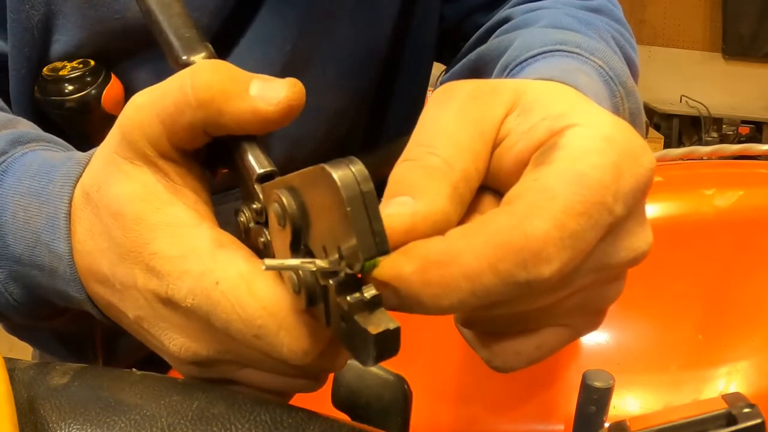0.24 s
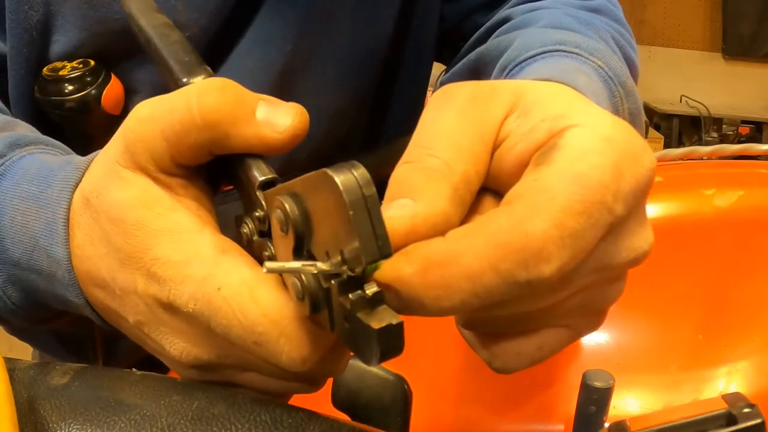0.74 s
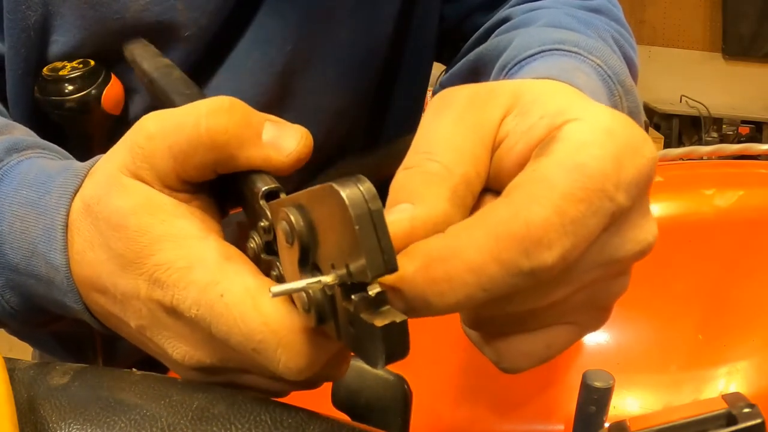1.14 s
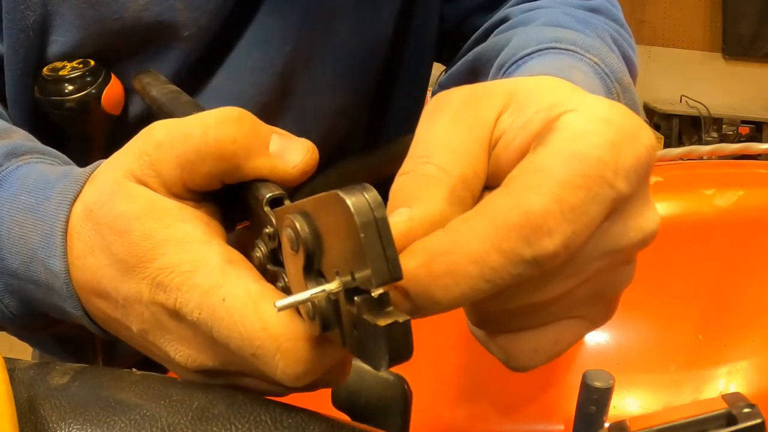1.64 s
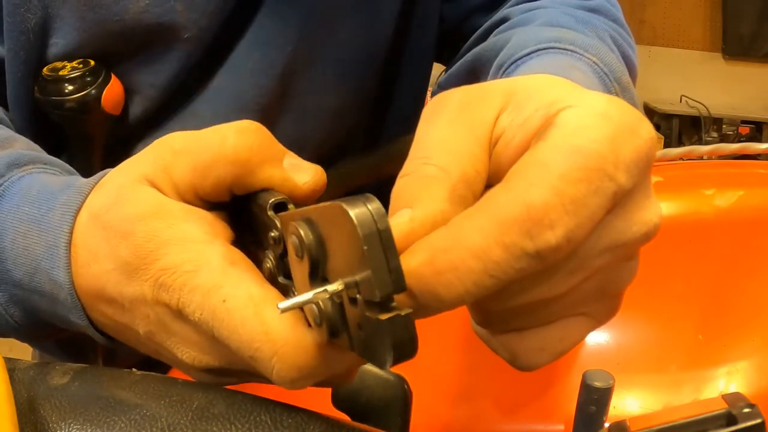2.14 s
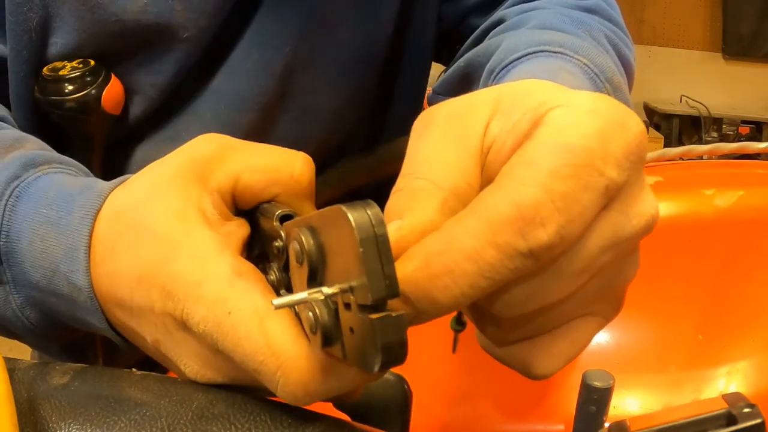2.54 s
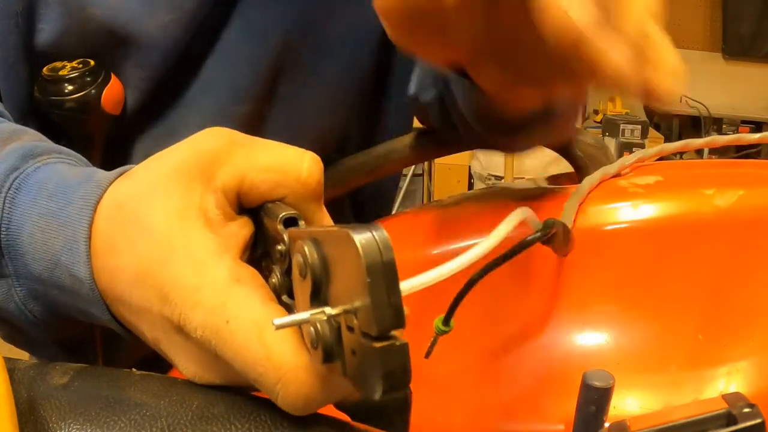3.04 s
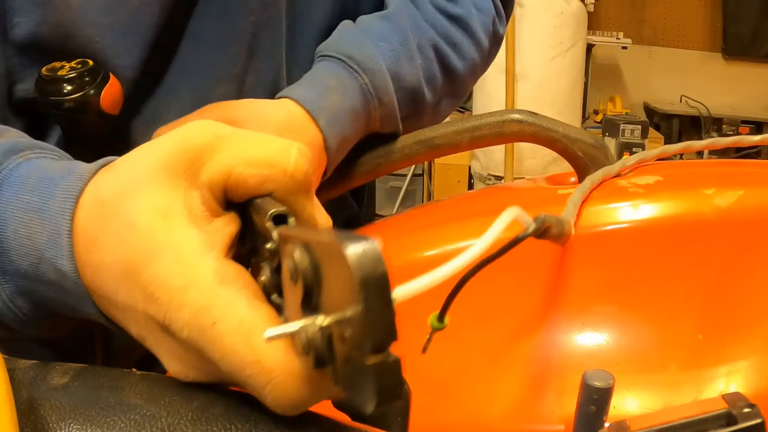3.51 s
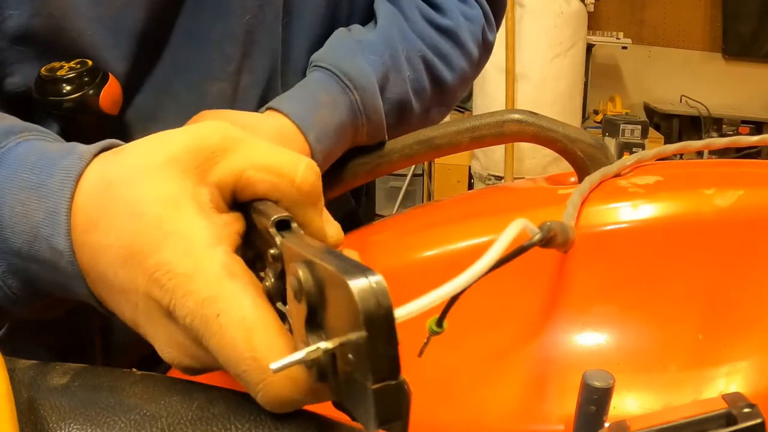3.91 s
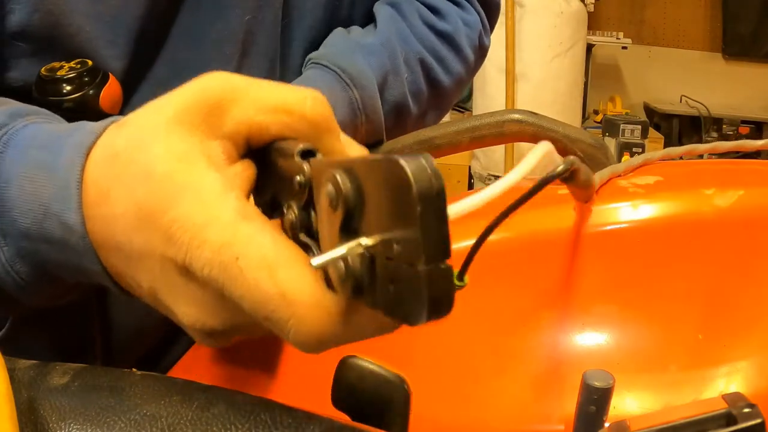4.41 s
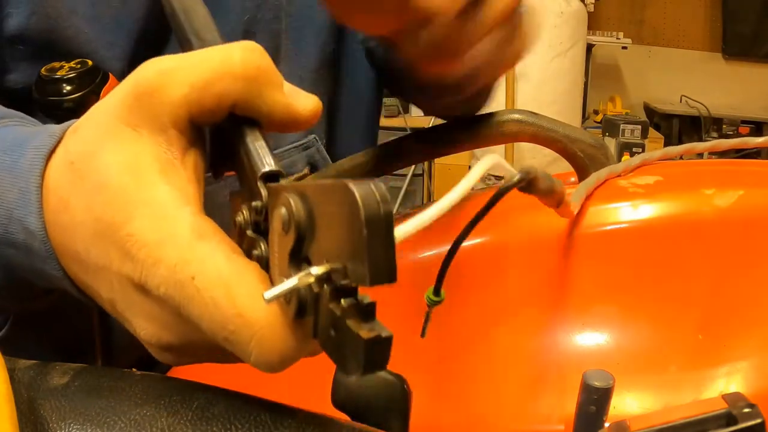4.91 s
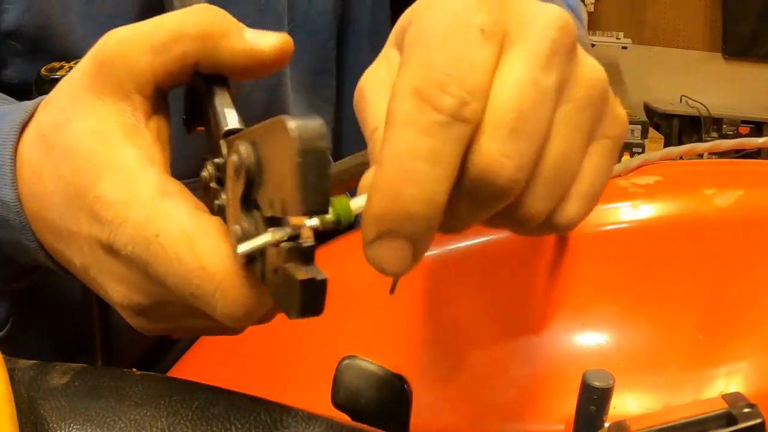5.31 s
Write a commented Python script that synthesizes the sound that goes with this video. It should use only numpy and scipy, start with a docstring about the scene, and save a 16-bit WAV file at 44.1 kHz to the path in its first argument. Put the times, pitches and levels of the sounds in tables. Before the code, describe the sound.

A small quiet workshop, heard very close and in stereo. For the first two seconds there is only soft air, a faint distant wavering drone that sinks in pitch, and tiny wire scratches around 0.6 to 0.95 s. At about 2.1 s a ratchet crimping tool is squeezed: five crisp, bright metal clicks by 2.4 s, then two more near 2.6 and 2.75, with small dull ticks, bumps and sleeve rustle. Around 3.2 s a hand brushes and softly knocks a sheet-metal tank. From 3.6 to 4.2 s a second squeeze clicks about every tenth of a second. Light ticks follow at 4.5; from 4.65 the pawl scrapes back, irregular at first, then a rapid rattle to 4.95 as the spring opens the handles, leaving a thin metallic ring. At 5.37 s a tick, high ping and light tank knock, then the wire slides off with a faint rising hiss.

```python
"""In a small workshop, close to the microphone, a ratchet crimping tool is squeezed shut in two runs of clicks
(noisy pawl impacts ring jaws, pawl and lever), then springs open while the pawl rattles back over its teeth.
Hands and sleeves rub (shaped noise), the tool knocks softly on a sheet-metal tank (decaying modes), a wire
catches, pings free and slides off, and a faint drone (two tones and a rumble) wavers far away in quiet air."""
import sys
import numpy as np
from scipy import signal
from scipy.fft import rfft, irfft
from scipy.io import wavfile
from scipy.ndimage import uniform_filter1d

SR = 44100
rng = np.random.default_rng(int(sys.argv[2]) if len(sys.argv) > 2 else 0)


def to_wav(sig):
    """Store sig (one row per channel, or 1-D mono) as 16-bit WAV at the path in sys.argv[1].

    Samples outside -1..1 are clipped; the rate is SR.
    """
    pcm = np.clip(np.atleast_2d(sig), -1, 1) * 32767
    pcm = np.round(pcm).astype(np.int16)
    wavfile.write(sys.argv[1], SR, pcm.T)  # frames by channels


N = 245240
TIME = np.arange(N) / SR
CLICK_T = np.arange(1024) / SR
LEAD_S = .004  # part of each click that precedes the drop of the pawl

# the pawl drops into a tooth while closing: start_s, gain_db, jaw_db, jaw_hz, pawl_hz
# (jaw_db: ring of the jaws before the gain of the direction)
CLOSING_TEETH = [(2.0968, -23, 2.5, 4060, 6200), (2.1432, -21.5, 3, 3820, 7900),
                 (2.2009, -22, 1, 3870, 7800), (2.2612, -22, 3, 3820, 6960), (2.3985, -21, 1.5, 3740, 7520),
                 (2.616, -22, -5.5, 3770, 6400), (2.735, -23.5, -4.5, 3870, 6300),
                 (3.6338, -24.5, -2.5, 3780, 6010), (3.7218, -23, -2, 3890, 6380),
                 (3.824, -24, 2, 3810, 6680), (3.9161, -22.5, -6.5, 3880, 6300),
                 (3.9927, -22.5, -5.5, 4220, 6300), (4.098, -37, -5, 3600, 5950),
                 (4.103, -25, 0, 3980, 6170), (4.2157, -39, -5.5, 3730, 6360)]
# spectrum of the opening crack, shared with the linkage ticks: freq_hz, gain_db
OPENING_SPECTRUM = [(200, -31), (700, -17.5), (1500, -0.5), (2600, 3), (4800, 10.5), (6000, 7), (6800, 7.5),
                    (8000, 5), (8800, -2), (9600, 0.5), (11400, 0), (12100, 2), (15500, -14.5),
                    (16000, -32.5)]


def undb(db):
    """Decibels to gain."""
    return 10 ** (np.asarray(db) / 20)


def unit(x, seconds):
    """Scale to the energy of a signal of rms 1 lasting so many seconds."""
    return x * np.sqrt(seconds * SR / np.sum(x ** 2))


def blow(x, db):
    """Set the level of a click, its energy counted over 5 ms."""
    return undb(db) * unit(x, .005)


def add(track, s, x):
    """Mix x into the track from time s."""
    i = int(s * SR)
    track[i:i + len(x)] += x[:N - i]


def colour(x, points):
    """Minimum-phase filter with the given (Hz, dB) spectrum, made by folding its cepstrum."""
    hz, db = np.transpose(points)
    f = np.maximum(np.fft.rfftfreq(4096, 1 / SR), 1)
    log_gain = np.log(undb(np.interp(np.log(f), np.log(hz), db)))
    cepstrum = irfft(log_gain)
    half = len(cepstrum) // 2
    cepstrum[1:half] *= 2
    cepstrum[half + 1:] = 0
    impulse = irfft(np.exp(rfft(cepstrum)))
    return signal.fftconvolve(x, impulse)[:len(x)]


def resonate(x, hz, width_hz):
    """One resonance."""
    b, a = signal.iirpeak(hz, hz / min(width_hz, SR / 4), SR)
    return signal.lfilter(b, a, x)


def ring(modes):
    """Free decay of a set of modes (Hz, dB, t60 s), each starting at a random phase."""
    t = np.arange(SR) / SR
    out = np.zeros(SR)
    for hz, db, t60_s in modes:
        tone = np.sin(2 * np.pi * (hz * t + rng.random()))
        out += undb(db) * tone * np.exp(-np.log(1000) * t / t60_s)
    return out


def walk(rate):
    """Smooth random wander with a spread of 1; rate is in new values per second."""
    k = int(SR / rate)
    steps = np.repeat(rng.standard_normal(N // k + 1), k)
    wander = uniform_filter1d(uniform_filter1d(steps, k), k)[:N]
    return wander / wander.std()


def air():
    """Quiet room noise, almost independent left and right."""
    # spectrum of the air: freq_hz, gain_db
    spectrum = [(20, -15.5), (50, -3), (100, -14), (160, -1), (230, -6.5), (320, -8), (440, -12.5),
                (700, -21), (1200, -20.5), (4500, -32), (7300, -34), (9500, -44), (16000, -49.5)]
    mid, side = (unit(colour(rng.standard_normal(N), spectrum), N / SR) for _ in range(2))
    return undb(-72) * (mid + 0.97 * side * np.array([[1], [-1]]))


def drone():
    """Two faint tones drift apart; the lower one wavers and flutters over a low rumble."""
    # path of the lower tone and its rumble: time_s, pitch_hz, gain_db
    low_path = [(0, 243, -67), (1.398, 228, -67), (2.399, 165, -69), (2.899, 160, -78), (3.5, 152, -71.5),
                (3.9, 162, -79.5), (5.56, 160, -84)]
    s, *columns = np.transpose(low_path)
    low_hz, low_db = (np.interp(TIME, s, c) for c in columns)
    # the upper tone climbs slowly and fades
    high_hz = 404 + 39 * TIME
    high_db = -78 - 2.5 * TIME
    waver = .08 * np.sin(2 * np.pi * 4.2 * TIME + walk(2.4)) + 0.036 * walk(50)
    low = np.sin(2 * np.pi * np.cumsum(low_hz * (1 + waver)) / SR)
    high = np.sin(2 * np.pi * np.cumsum(high_hz * (1 + 0.0085 * walk(7.3))) / SR)
    rumble = unit(resonate(resonate(rng.standard_normal(N), 165, 38), 210, 90), N / SR)
    flutter_db = 4 * walk(70)
    lower_part = (low * undb(flutter_db - 3.5) + 0.54 * rumble) * undb(low_db)
    return lower_part + high * undb(high_db + 1.3 * walk(43))


def catches(count=5):
    """Strands of the wire end catch in the terminal at uneven moments of each push."""
    # pushes of the wire: start_s, length_s
    pushes = [(.61, .18), (.84, .11)]
    # modes of the terminal held in the jaws: freq_hz, gain_db, t60_s
    terminal = [(2370, -2, 0.01), (3430, -5, 0.018), (4500, 0, 0.014), (4900, -1, .01)]
    mean_db, scatter_db = -75, 1.5
    out = np.zeros(N)
    for start, length in pushes:
        for k in range(count):
            s = start + length * (k + rng.random()) / count
            add(out, s, blow(ring(terminal), mean_db + scatter_db * rng.standard_normal()))
    return out


def wire():
    """The wire is pushed in; at the end the terminal pings free and the wire slides off with a rising hiss."""
    ping_s, ping_hz, ping_db, ping_t60_s = 5.364, 9800, -66, .2
    slide_from_s, slide_rise_s, slide_db = 5.42, .11, -76.5
    slide_hz, slide_hz_per_s = 1100, 5600
    out = catches()
    add(out, ping_s, blow(ring([(ping_hz, 0, ping_t60_s)]), ping_db))
    # drawn away through the fingers, faster and louder: slow noise on a rising carrier
    drawn_s = np.maximum(TIME - slide_from_s, 0)
    low_pass = signal.butter(2, 150, fs=SR, output="sos")
    grain = unit(signal.sosfilt(low_pass, rng.standard_normal(N)), N / SR)
    carrier = np.sin(2 * np.pi * np.cumsum(slide_hz + slide_hz_per_s * drawn_s) / SR)
    squeak = np.sqrt(2) * grain * carrier
    return out + squeak * undb(slide_db) * np.minimum(drawn_s / slide_rise_s, 1)


def bump(hz):
    """A thud that dies away within a few cycles, with a scuff of skin."""
    t, decay_s = np.arange(SR // 4) / SR, 2.7 / hz
    fade = np.exp(-t / decay_s)
    thud = unit(np.sin(2 * np.pi * hz * t) * fade, decay_s)
    push = rng.standard_normal(len(t)) * fade
    scuff = unit(resonate(resonate(push, hz, hz), hz, hz), decay_s)
    return 0.9 * thud + 1.2 * scuff


def rubbing():
    """Sleeve and fingers rub: cloth-coloured noise swells with each stroke and flickers in level."""
    # strokes: start_s, length_s, gain_db
    rubs = [(0.585, 0.76, -86.5), (2.013, 0.89, -70.5), (3.032, 0.026, -70.5), (3.15, 0.045, -69),
            (3.501, 0.75, -73.5), (4.554, .1, -73), (4.75, 0.2, -63.5), (5.299, .1, -79.5),
            (5.536, .03, -74.5)]
    # spectrum of the cloth: freq_hz, gain_db
    cloth = [(60, -18), (230, 6.5), (600, -9), (1300, 0), (3000, -2), (7000, -2), (9000, -10), (15000, -27)]
    attack_s, release_s = 0.017, 0.054
    strokes = np.zeros(N)
    for s, length, db in rubs:
        rise = np.minimum(TIME - s, 0) / attack_s
        fall = np.maximum(TIME - s - length, 0) / release_s
        strokes += undb(db) * np.exp(rise - fall)
    rub = unit(colour(rng.standard_normal(N), cloth), N / SR)
    return rub * strokes * undb(1.4 * walk(76))


def handling():
    """Damped bumps, the recoil of the teeth in the hand, ringing knocks on the tank and rubbing cloth."""
    # soft bumps of hand and tool: start_s, gain_db, centre_hz
    bumps = [(2.524, -55, 216), (2.573, -58.5, 210), (2.761, -57.5, 290), (2.768, -53.5, 117),
             (2.841, -65.5, 96), (2.911, -63, 287.3), (3.036, -62.5, 1166), (3.18, -65, 330),
             (3.475, -68.5, 170), (3.635, -62.5, 330), (3.723, -65.5, 302), (3.985, -62, 459),
             (4.133, -62, 620), (5.366, -60.5, 382), (5.372, -57.5, 880), (5.392, -63, 199)]
    # knocks on the tank: start_s, level_db
    knocks = [(3.175, -61.5), (5.37, -61)]
    # modes of the sheet-metal tank: freq_hz, gain_db, t60_s
    tank = [(280.5, 6, 0.26), (459.6, 9.5, 0.18), (760, -9, 0.19), (850, -9, 0.39), (975, 5, 0.14),
            (1054, 6, 0.15)]
    recoil_db, recoil_hz = -71, 330
    out = np.zeros(N)
    for s, db, hz in bumps:
        add(out, s, undb(db) * bump(hz))
    for s, *_ in CLOSING_TEETH + release():
        add(out, s, undb(recoil_db) * bump(recoil_hz))
    for s, db in knocks:
        add(out, s, undb(db) * unit(ring(tank), 0.027))
    return out + rubbing()


def contact(slip_ms, chatter_ms, scrape_db, snap):
    """Force on a tooth: the pawl slips over the crest, lands with a snap, chatters and scrapes to rest."""
    ms = (CLICK_T - LEAD_S) * 1000
    drop = np.exp(-abs(ms) / np.where(ms < 0, slip_ms, chatter_ms))
    scrape = undb(scrape_db) * np.exp(-abs(ms) / np.where(ms < 0, 2 * slip_ms, 4.5))
    landing = signal.unit_impulse(len(ms), int(LEAD_S * SR) + 6)  # six samples after the drop
    return snap * landing + (drop + scrape) * rng.standard_normal(len(ms))


def linkage(snap):
    """Play in the pivots gives small dull ticks: one broad resonance over a weaker crack."""
    # ticks: start_s, level_db, centre_hz
    ticks = [(2.011, -58, 3330), (2.0864, -51, 3900), (2.524, -45, 3330), (2.576, -48.5, 2120),
             (2.687, -51.5, 3620), (2.764, -46, 2800), (2.833, -58, 3280), (2.869, -56, 3410),
             (2.888, -54, 4300), (2.966, -61, 3200), (3.132, -56.5, 3700), (4.135, -48.5, 1695),
             (4.48, -56.5, 4120), (4.59, -57, 2700), (4.995, -47, 6900), (5.3639, -47, 8000),
             (5.364, -48.5, 1816), (5.39, -64, 6960), (5.535, -64, 6500)]
    out = np.zeros(N)
    for s, db, hz in ticks:
        force = contact(0.96, chatter_ms=0.47, scrape_db=-26.5, snap=snap)
        crack = colour(force, OPENING_SPECTRUM)
        body = resonate(crack, hz, width_hz=.4 * hz)
        add(out, s - LEAD_S, blow(body, db) + blow(crack, db - 8))
    return out


def release(count=7):
    """Teeth passed on the way back, eased by hand and then running free: (s, jaw dB, crack dB)."""
    # teeth eased open one by one: start_s, jaw_db (before the gain of the direction)
    eased = [(4.6519, -55), (4.6795, -26.5), (4.7371, -34), (4.7702, -40), (4.797, -21), (4.8306, -25.5),
             (4.848, -22)]
    crack_db = -25.5
    teeth = [(s, jaw_db, crack_db) for s, jaw_db in eased]
    # then the spring takes over and the last teeth pass evenly, with less and less crack
    run_start_s, run_gap_s = 4.8623, .01295
    for k in range(count):
        # at speed the pawl only skims every other tooth
        skim_db = -5 * (k % 2 == 0)
        jaw_db = -22 + skim_db - k * 0.1
        teeth.append((run_start_s + k * run_gap_s, jaw_db, crack_db - k * 1.2))
    return teeth


def opening(snap, ring_db):
    """The unloaded pawl scrapes back: broader, longer clicks, each with one weak bounce."""
    jaw_hz = 3700  # ring of the unloaded jaws
    bounce_s, bounce_db = 0.0058, -20.5  # delay, and level relative to the crack
    out = np.zeros(N)
    for s, jaw_db, crack_db in release():
        force, bounce = (contact(0.92, chatter_ms=.9, scrape_db=-19, snap=snap) for _ in range(2))
        jaw = resonate(resonate(force, jaw_hz, 420), jaw_hz, 1595)
        crack = blow(colour(force, OPENING_SPECTRUM), crack_db)
        add(out, s - LEAD_S, blow(jaw, jaw_db + ring_db) + crack)
        rebound = blow(colour(bounce, OPENING_SPECTRUM), crack_db + bounce_db)
        add(out, s - LEAD_S + bounce_s, rebound)
    return out


def closing(snap, ring_db):
    """Each tooth rings the jaws, the loaded pawl and the lever for a few milliseconds."""
    # the grip, first one hand and then two, sets how the parts ring: start_s, pawl_db, lever_hz
    # (pawl_db: ring at the start of the squeeze, before the gain of the direction)
    squeezes = [(2.05, -5.5, 3038), (3.6, 2, 2645)]
    # spectrum of the crack: freq_hz, gain_db
    crack_spectrum = [(200, -21), (700, -31), (1000, -25), (1350, -8), (1950, -7), (2600, -11), (3300, 10),
                      (4400, 13), (5500, 8.5), (8000, 4), (9700, -10), (12200, 2), (14000, -13.5),
                      (16000, -26.5)]
    clamp_db_per_s = 10  # the pawl rings less as a squeeze builds up
    out = np.zeros(N)
    for s, db, jaw_db, jaw_hz, pawl_hz in CLOSING_TEETH:
        start, pawl_db, lever_hz = [row for row in squeezes if row[0] < s][-1]
        clamp_db = -clamp_db_per_s * (s - start)
        force = contact(0.42, chatter_ms=0.77, scrape_db=-28.5, snap=snap)
        jaw = resonate(resonate(force, jaw_hz, 430), jaw_hz, 620)
        pawl = resonate(resonate(force, pawl_hz, 280), pawl_hz, 2500)
        lever = resonate(resonate(force, lever_hz, 250), lever_hz, 600)
        rings = blow(jaw, jaw_db) + blow(pawl, pawl_db + clamp_db)
        # the frame answers the swing of the jaws with a dull knock
        frame = blow(resonate(resonate(force, 1500, 230), 1200, 450), jaw_db - 26.5)
        crack = blow(colour(force, crack_spectrum), -1.1) + blow(lever, -17.5) + frame
        add(out, s - LEAD_S, undb(db) * (undb(ring_db) * rings + crack))
    return out


def tool(snap, ring_db):
    """All the clicks of the tool as radiated in one direction."""
    return closing(snap, ring_db) + opening(snap, ring_db / 3) + linkage(snap)


def singing(clicks):
    """Handles and return spring ring long after the clicks, and again as the spring is let go."""
    # long modes of handles and return spring: freq_hz, gain_db, t60_s
    spring = [(2159, -13, .55), (2964, -7, .4), (3605, -5, .85), (3687, -7, .45), (4150, 0, .4),
              (4522, -3, .4), (5322, -9, .35), (5701, -8, .35), (6035, -4, .3), (6239, -11, .5),
              (6514, -11, .5), (6848, -3, .33), (6998, -9, .5), (7192, -14, .6), (8145, -17, .4)]
    out = undb(-74) * signal.fftconvolve(clicks, ring(spring))[:N]
    # the spring rings on when the last tooth frees it and when the handles come fully open
    freed = colour(ring(spring), [(3700, 1), (4500, 9.5), (7000, 15.5)])
    add(out, CLOSING_TEETH[-1][0], undb(-70.5) * freed)
    add(out, release()[-1][0], undb(-59.5) * ring(spring))
    return out


def workshop(x, t60_s, wet_db, near_s, near_db, echo_s, echo_db):
    """A bounce off the tank, scatter from things nearby and the tail of the room, as shaped noise."""
    # spectrum of the reverberation: freq_hz, gain_db
    room_spectrum = [(200, -19), (600, -2), (1100, 6), (2000, 5), (2900, 6.5), (3700, 0.5), (4600, -1),
                     (5400, 0.5), (6400, 2), (8000, -2.5), (10000, -2.5), (12200, -8), (16000, -20.5)]
    t = np.arange(int(.7 * SR)) / SR
    tail = undb(wet_db) * unit(np.exp(-np.log(1000) * t / t60_s), 1 / SR)
    near = undb(near_db) * unit(np.exp(-t / near_s), 1 / SR)
    echo = undb(echo_db) * unit(np.exp(-abs(t - echo_s) / 0.0001), 1 / SR)
    envelope = np.sqrt(tail ** 2 + near ** 2 + echo ** 2) * (t > .002)
    response = envelope * rng.standard_normal(len(t))
    # the highest treble is absorbed sooner
    dull = signal.sosfiltfilt(signal.butter(2, 8000, fs=SR, output="sos"), response)
    response = dull + (response - dull) * np.exp(-t / .13)
    return signal.fftconvolve(x, colour(response, room_spectrum))[:N]


def ports(x, oblique):
    """The right port is reached first and takes more treble; short waves differ from port to port."""
    # how far the left port lags: freq_hz, phase_rad
    port_lag = [(0, 0), (1400, .5), (2600, .8), (3700, .7), (5000, 1), (8000, .8), (13000, .6)]
    side = colour(oblique, [(1000, -14.0), (3700, -11.5), (5000, -8.5), (8000, -5), (12000, -4.0)])
    f = np.fft.rfftfreq(N, 1 / SR)
    left_db = np.interp(f, [3900, 4600, 6160, 8000, 12000], [-1.0, -1, -3.5, -1.5, -6.0])
    right_db = np.interp(f, [3680, 4740, 6000, 8000, 11600], [0.1, 0.44, 2.3, 2.1, 0.4])
    lag = np.exp(-1j * np.interp(f, *np.transpose(port_lag)))
    left = irfft(rfft(x + side) * undb(left_db) * lag, N)
    right = irfft(rfft(x - side) * undb(right_db), N)
    return np.array([left, right])


def scene():
    """Clicks set the spring and handles ringing; tool, hands and wire sound in the workshop."""
    # the jaws face the microphone, so their ring is weaker in the other directions
    front, oblique = tool(snap=2.8, ring_db=-1.5), tool(snap=0, ring_db=-9)
    to_left, to_right = (tool(snap=3.2, ring_db=-15) for _ in range(2))
    soft = singing(front) + handling() + wire()
    left, right, shared = (
        workshop(x + soft, t60_s=0.38, wet_db=-13.0, near_s=0.0098, near_db=-10.0,
                 echo_s=0.0073, echo_db=-24)
        for x in (to_left, to_right, (to_left + to_right) / 2))
    # long waves of the reverberation reach both ports alike
    room = np.array([left, right]) + colour(shared, [(2500, 1.5), (4000, -5.5), (6000, -5.0)])
    far_drone = drone() * undb([[-3], [2]])  # stronger on the right
    return ports(front + soft, oblique) + room + air() + far_drone


def record(dry):
    """The recorder cuts the top above 16.2 kHz."""
    return signal.sosfilt(signal.ellip(8, .2, 70, 16200, fs=SR, output="sos"), dry)


dry = scene()
out = record(dry)
to_wav(out)
```